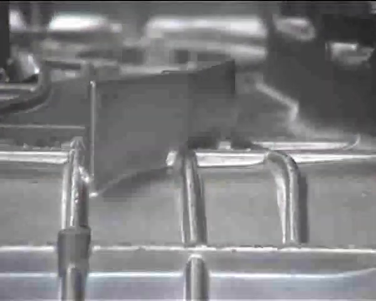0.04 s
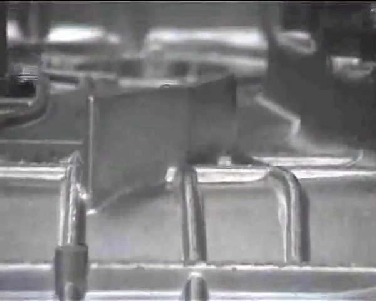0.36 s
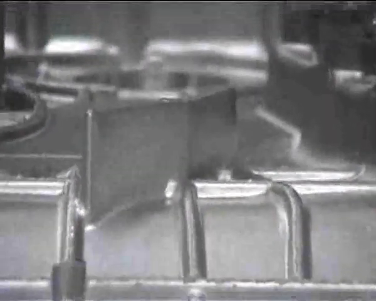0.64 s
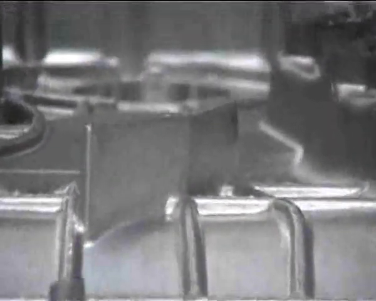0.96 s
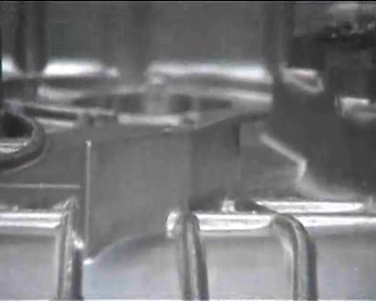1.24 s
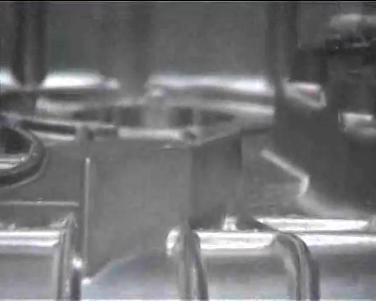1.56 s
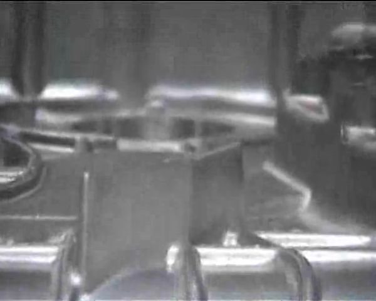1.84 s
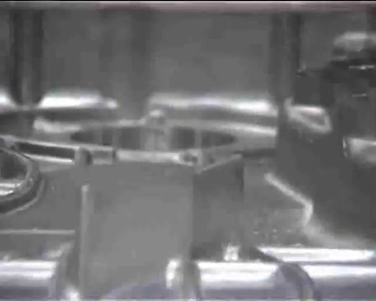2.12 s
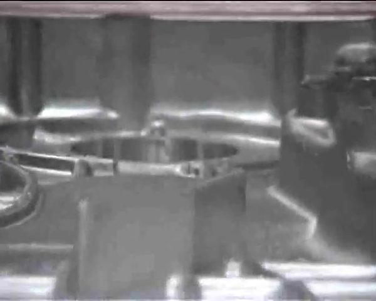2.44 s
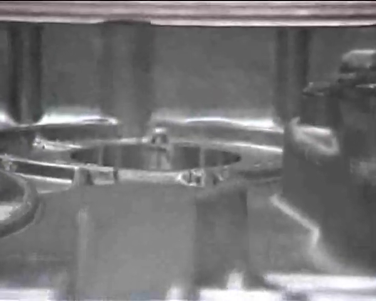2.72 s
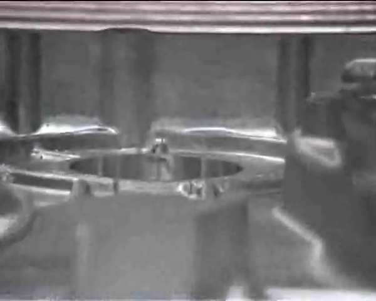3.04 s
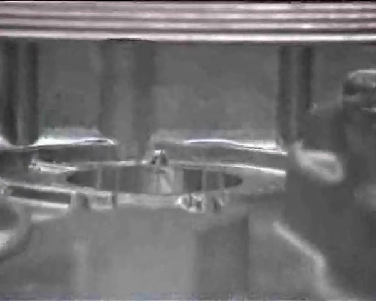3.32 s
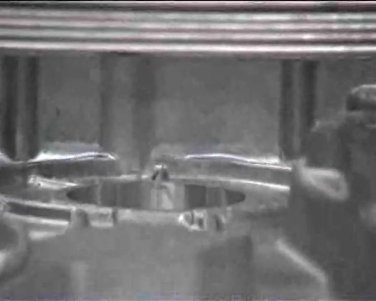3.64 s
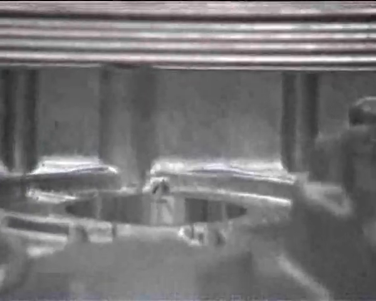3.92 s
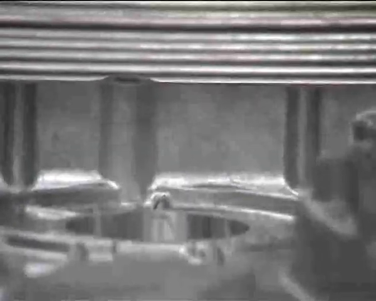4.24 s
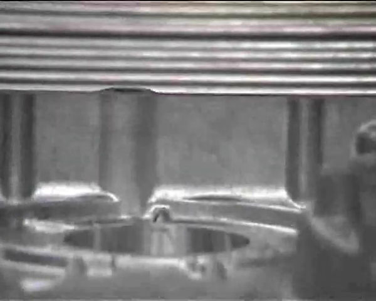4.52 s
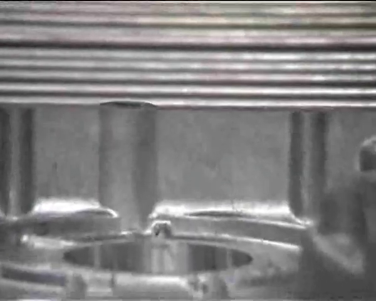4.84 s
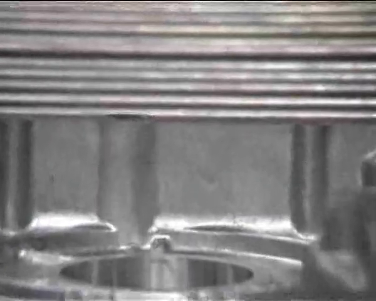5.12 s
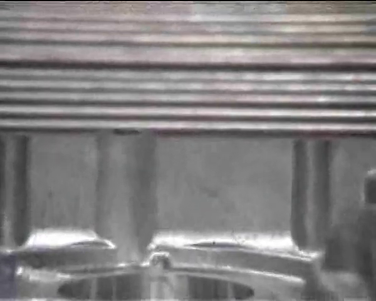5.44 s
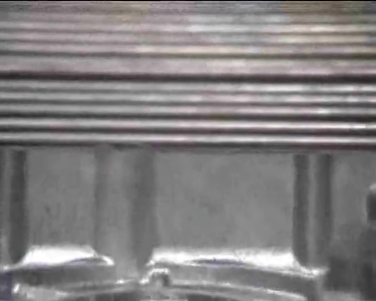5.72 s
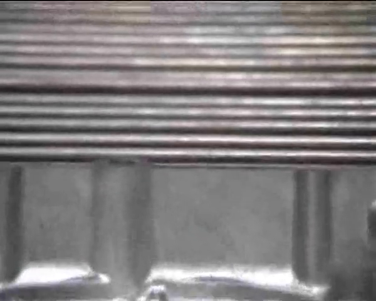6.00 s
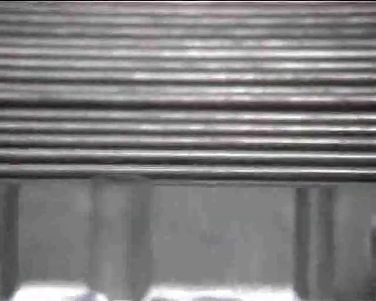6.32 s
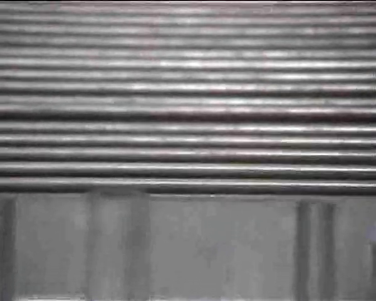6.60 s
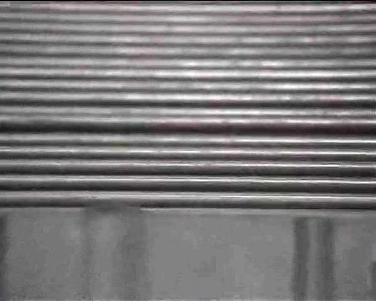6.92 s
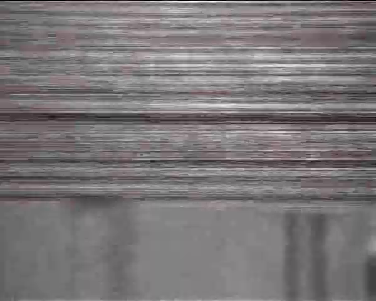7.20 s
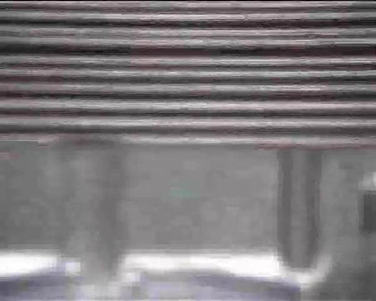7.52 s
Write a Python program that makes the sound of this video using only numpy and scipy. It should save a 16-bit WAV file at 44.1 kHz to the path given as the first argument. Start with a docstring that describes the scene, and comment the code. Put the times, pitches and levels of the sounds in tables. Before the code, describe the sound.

A dense rush of air builds within the first half second and then holds for the whole seven and a half seconds, inside the metal housing of a running machine. It blends a midrange roar with a bright hiss, slightly hollow in tone. A very soft low bump is buried in the opening. A faint motor hum runs underneath, and a mid-pitched whine swells around 2, 4, 4.7 and 7.3 seconds. Low rumbling grows gently toward 2.5 seconds and again from about 5 to 6 seconds. Faint breathy whistles, some high and some lower, come and go in the flow, mostly before 4.5 seconds and again after 6.3. At about 6 seconds the level dips for an instant and recovers. The hiss eases slightly as the roar slowly grows. The microphone is small and narrow in range, with little deep bass and softened treble.

```python
"""A rush of air builds quickly, then holds, inside a running industrial machine.
Turbulence roars in the ducts, hisses at narrow gaps, rumbles in the metal housing and buffets below.
A motor turning just under 50 times a second hums beneath; a machine whine and a low drone swell at times.
The flow whistles at an edge now and then; the housing bumps softly once; late on the level dips briefly.
A small, narrow-band microphone listens."""
import sys
import numpy as np
from scipy import signal
from scipy.fft import rfft, irfft
from scipy.io import wavfile

SR = 44100
rng = np.random.default_rng(int(sys.argv[2]) if len(sys.argv) > 2 else 0)


def put_to_file(sound):
    """Save the sound as 16-bit audio at rate SR, in the file named by the first command-line argument."""
    columns = np.atleast_2d(sound).T  # one column per channel
    safe = np.clip(columns, -1, 1)
    whole_steps = np.round(safe * 32767)
    wavfile.write(sys.argv[1], SR, whole_steps.astype(np.int16))


N = 337806
TIME = np.arange(N) / SR
BIN_HZ = np.arange(N // 2 + 1) * SR / N
FREQ = np.maximum(BIN_HZ, 1)


def undb(db):
    """Decibels to gain."""
    return 10 ** (np.asarray(db) / 20)


def bell(at_s, length_s):
    """Smooth rise and fall, 1 at its top."""
    return np.exp(-2 * ((TIME - at_s) / length_s) ** 2)


def ramp(at_s, length_s):
    """Linear rise from 0 to 1, then held."""
    return np.clip((TIME - at_s) / length_s, 0, 1)


def colour(points):
    """Gain per bin from (Hz, dB) points, falling away beyond both ends."""
    hz, db = np.transpose(points)
    ends = np.minimum(FREQ / hz[0], 1) * np.minimum(hz[-1] / FREQ, 1)
    return undb(np.interp(np.log(FREQ), np.log(hz), db)) * ends ** 2


def resonance(hz, width_hz):
    """Gain of one resonance, 1 at its centre."""
    return 1 / np.sqrt(1 + ((FREQ ** 2 - hz ** 2) / (FREQ * width_hz)) ** 2)


def noise(gain):
    """Noise with the given spectrum, rms 1."""
    x = irfft(rfft(rng.standard_normal(N)) * gain, N)
    return x / x.std()


def drift(rate_hz):
    """Slow random motion up to about rate_hz, spread 1."""
    return noise(1 / (1 + (BIN_HZ / rate_hz) ** 4))


def eddies(gain, flicker_db, rate_hz, bands=12):
    """Turbulence whose bands swell and sink independently as eddies pass, rms 1."""
    band_position = np.interp(np.log(FREQ), np.log([60, 9000]), [0, bands - 1])
    spectrum = rfft(rng.standard_normal(N)) * gain
    x = np.zeros(N)
    for k in range(bands):
        window = np.maximum(1 - abs(band_position - k), 0)
        x += irfft(spectrum * window, N) * undb(flicker_db * drift(rate_hz))
    return x / x.std()


def flow_db(start_db=-10.5, build_s=0.25):
    """Flow strength relative to full: rises quickly, levels off."""
    return start_db * np.exp(-TIME / build_s)


# duct roar spectrum: f/Hz, density/dB
ROAR_SPECTRUM = [(80, -54), (200, -25.5), (330, -14.5), (430, -9), (510, -4), (720, -2), (900, 1),
                 (1030, -0.5), (1300, 1.5), (1550, -1), (1800, -4.5), (2100, -6.5), (3400, -13.5),
                 (4200, -27.5)]
# surges and lulls: centre t/s, length/s, change/dB
ROAR_SURGES = [ (.65, 0.23, 1.9), (1.3, 0.22, -1.2), (1.65, 0.25, 1.2), (2.522, .3, 0.5), (3.98, 0.16, 1.2),
               (4.38, .2, -1), (5.5, 0.31, 0), ]


def duct_roar(casing_gain, level_db=-22.5, growth_db_per_s=0.1634):
    """Turbulence in the ducts surges, lulls and slowly grows."""
    surge_db = sum(db * bell(at, length) for at, length, db in ROAR_SURGES)
    roar = eddies(colour(ROAR_SPECTRUM) * casing_gain, flicker_db=0.5, rate_hz=6)
    return roar * undb(level_db + growth_db_per_s * TIME + surge_db)


# gap hiss spectrum: f/Hz, density/dB
HISS_SPECTRUM = [(100, -45.5), (1200, -20.5), (2000, -4), (2600, -3), (3100, 0), (3700, -1.5), (4150, -8.5),
                 (4700, -9), (6200, -9), (7400, -8), (8100, -12), (8900, -20), (9600, -27), (9900, -53)]
# steps down in the hiss: start t/s, length/s, drop/dB
HISS_DROPS = [(1.8, .3, 1.33), (5.9, 0.3, 1.2)]


def gap_hiss(casing_gain, level_db=-22, ease_db_per_s=0.1948):
    """Air hisses through narrow gaps and slowly eases."""
    drop_db = sum(db * ramp(at, length) for at, length, db in HISS_DROPS)
    hiss = eddies(colour(HISS_SPECTRUM) * casing_gain, flicker_db=0.41, rate_hz=11)
    return hiss * undb(level_db - ease_db_per_s * TIME - drop_db)


# housing rumble spectrum: f/Hz, density/dB
RUMBLE_SPECTRUM = [(40, -30.5), (90, -18.5), (125, -12.5), (165, -10), (205, -5.5), (255, -2), (310, -0.5),
                   (400, 2.5), (800, -20)]
# deep buffeting spectrum: f/Hz, density/dB
BUFFET_SPECTRUM = [(20, -10.5), (48, 2.5), (100, 1), (180, 3), (400, -17), (1500, -50)]
# spells of low turbulence: start t/s, build-up/s, end t/s, rumble lift/dB, buffet lift/dB
TURBULENT_SPELLS = [ (0.5, 1.2, 2.52, 5.5, 10), (2.2, .9, 3.42, 3, 13), (4.3, 1.2, 6.01, 9, 13),
                    (6.6, .7, 7.66, 3, 6), ]


def low_turbulence(casing_gain, rumble_db=-44, buffet_db=-63.5, collapse_s=0.19):
    """Large eddies rumble and buffet, louder in spells that build slowly and collapse fast."""
    for start, build, end, rumble_lift, buffet_lift in TURBULENT_SPELLS:
        spell = ramp(start, build) * np.exp(-np.maximum(TIME - end, 0) / collapse_s)
        rumble_db = rumble_db + rumble_lift * spell
        buffet_db = buffet_db + buffet_lift * spell
    rumble = eddies(colour(RUMBLE_SPECTRUM) * casing_gain, flicker_db=1.5, rate_hz=9)
    buffet = noise(colour(BUFFET_SPECTRUM) * casing_gain)
    return rumble * undb(rumble_db) + buffet * undb(buffet_db + 2.8 * drift(11))


# air resonances of the casing: f/Hz, width/Hz, lift/dB
CASING_MODES = [(95, 12, -0.5), (141, 9, 4.5), (188.3, 10, 8), (204, 9.4, 8), (287, 13, 2.5),
                (494, 24, 3.5), (628, 43, 4.5), (685, 22, 3), (780, 32, 2), (860, 18, 1.5), (906, 16, 1),
                (959, 35, 1.5), (1122, 18, 3), (1170, 28, 2), (1400, 25, 1.5), (1580, 18, 0.5),
                (1740, 30, 5), (1810, 25, 5), (2220, 27, 0), (2900, 60, 0.6), (3220, 46, -1)]


def airflow(waver_db=0.28):
    """The hollow casing colours all flow noise; roar and hiss waver together."""
    casing_gain = undb(sum(db * resonance(hz, width) ** 2 for hz, width, db in CASING_MODES))
    rush = duct_roar(casing_gain) + gap_hiss(casing_gain)
    lows = low_turbulence(casing_gain)
    return (rush * undb(waver_db * drift(11)) + lows) * undb(flow_db())


def tone(cycles, waver_db, rate_hz):
    """Sine of rms about 1, wavering in the draught."""
    sine = np.sqrt(2) * np.sin(2 * np.pi * (cycles + rng.random()))
    return sine * undb(waver_db * drift(rate_hz))


# motor hum: multiple of shaft rate, level/dB
SHAFT_HARMONICS = [(2, -65), (4, -68.5), (11, -53), (12, -40), (13, -43), (28, -41.5), (32, -42)]


def motor_hum(shaft_hz=49.83):
    """Harmonics of a slightly drifting shaft; the hum rises with the flow."""
    turns = np.cumsum(shaft_hz * (1 + 0.001085 * drift(2.21))) / SR
    hum = sum(tone(k * turns, waver_db=2.4, rate_hz=3.8) * undb(db) for k, db in SHAFT_HARMONICS)
    return hum * undb(flow_db())


def swelling_tone(hz, rest_db, swells, pitch_spread):
    """A faint tone, slightly unsteady in pitch, rises with the flow and swells at times."""
    cycles = np.cumsum(hz * (1 + pitch_spread * drift(11))) / SR
    swelling = sum(bell(at, length) * undb(db) for at, length, db in swells)
    return tone(cycles, waver_db=2.2, rate_hz=16) * (undb(rest_db + flow_db()) + swelling)


# swells of the whine: peak t/s, length/s, level/dB
WHINE_PEAKS = [ (.5, 0.2, -40), (1.97, .3, -31.5), (3.15, 0.33, -37), (4.02, 0.069, -30.5),
               (4.686, 0.32, -33.5), (5.45, 0.56, -38), (7.283, 0.35, -31), ]
# swells of the drone: peak t/s, length/s, level/dB
DRONE_PEAKS = [ (.6, .18, -58), (1.35, .55, -53.5), (2.48, .24, -49), (3.3, .25, -55), (4.83, .2, -54),
               (5.65, 0.56, -55), (7.55, .4, -59.5), ]


def whine_and_drone():
    """A machine whine near 13 times the shaft rate and a low drone sound throughout."""
    whine = swelling_tone(hz=647, rest_db=-45.5, swells=WHINE_PEAKS, pitch_spread=0.0033)
    drone = swelling_tone(hz=93, rest_db=-69.5, swells=DRONE_PEAKS, pitch_spread=0.012)
    return whine + drone


def brief_ring(at_s, length_s, hz, width_hz, db, sag=0.02):
    """A steep-skirted resonance, fed for a moment, rings unsteadily and sags in pitch."""
    ring = noise(resonance(hz, 1.77 * width_hz) ** 2)
    speed = 1 - sag * np.clip((TIME - at_s) / length_s, -1, 1)
    sagging = np.interp(np.cumsum(speed) % N, np.arange(N), ring)
    return sagging * bell(at_s, length_s) * undb(db)


# edge whistles: peak t/s, length/s, f/Hz, nominal width/Hz, level/dB
EDGE_WHISTLES = [ (0.174, 0.3, 3125, 130, -25), (0.919, 0.55, 4600, 230, -33.5),
                 (1.45, 0.57, 3070, 330, -29.5), (2.355, 0.086, 1330, 68, -28), (2.553, .25, 613, 82, -30),
                 (3.052, 0.133, 630, 45, -28.5), (3.131, 0.44, 4750, 300, -36),
                 (3.46, 0.34, 5380, 410, -35.5), (3.578, 0.15, 1770, 110, -26.5),
                 (3.65, 0.3, 2360, 560, -25.5), (4.2, 0.27, 2600, 500, -29.5), (4.41, 0.3, 5020, 540, -32),
                 (6.381, 0.273, 540, 14, -27.5), (6.432, 0.333, 920, 40, -28.5), (7.3, 1.0, 1285, 165, -29),
                 ]


def edge_whistles():
    """Flow over edges gives breathy whistles and hoots."""
    return sum(brief_ring(*row) for row in EDGE_WHISTLES)


# housing bump: peak t/s, length/s, f/Hz, nominal width/Hz, level/dB
HOUSING_BUMP = [(.153, .035, 155, 50, -41)]


def housing_bump():
    """The housing rings low and briefly: one soft bump."""
    return sum(brief_ring(*row) for row in HOUSING_BUMP)


def level_dip(at_s, depth_db, recovery_s):
    """Gain that drops abruptly and recovers."""
    elapsed_s = np.maximum(TIME - at_s, 0)
    return undb(-depth_db * (TIME > at_s) * np.exp(-elapsed_s / recovery_s))


def scene():
    """All sources in mono, with one brief dip."""
    mix = airflow() + motor_hum() + whine_and_drone() + edge_whistles() + housing_bump()
    return (mix * level_dip(at_s=6.036, depth_db=6, recovery_s=0.07))[None]


def record(dry, rolloff_hz=9000, cutoff_hz=9900):
    """The recorder rolls the treble off, then cuts it steeply."""
    soft = signal.sosfilt(signal.butter(12, rolloff_hz, fs=SR, output="sos"), dry)
    return signal.sosfilt(signal.ellip(10, 0.2, 80, cutoff_hz, fs=SR, output="sos"), soft)


dry = scene()
out = record(dry)
put_to_file(out)
```